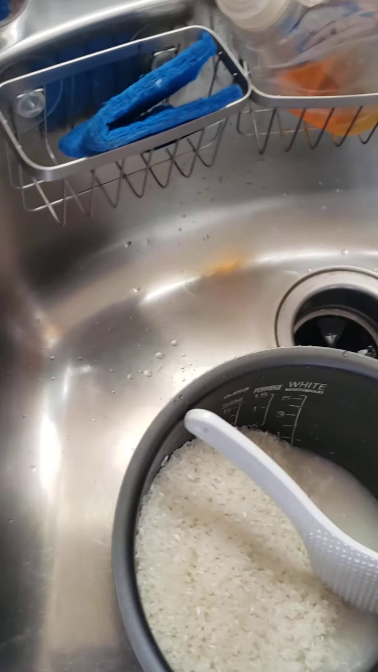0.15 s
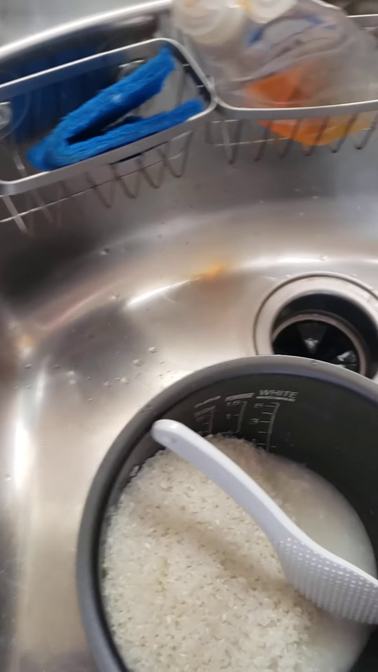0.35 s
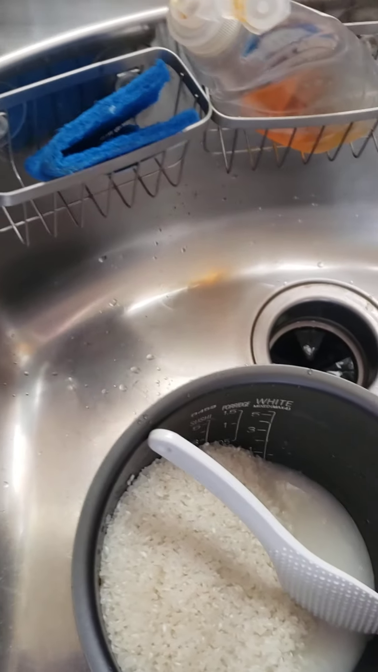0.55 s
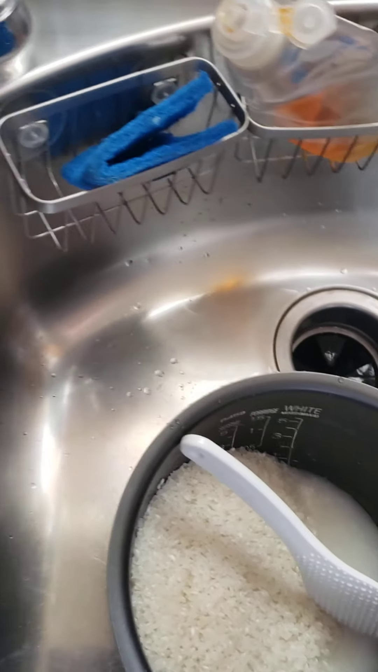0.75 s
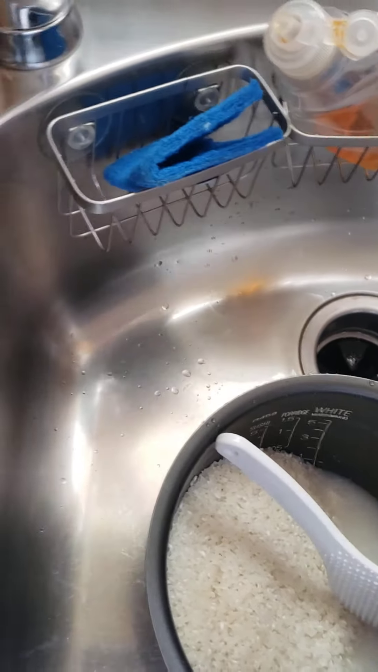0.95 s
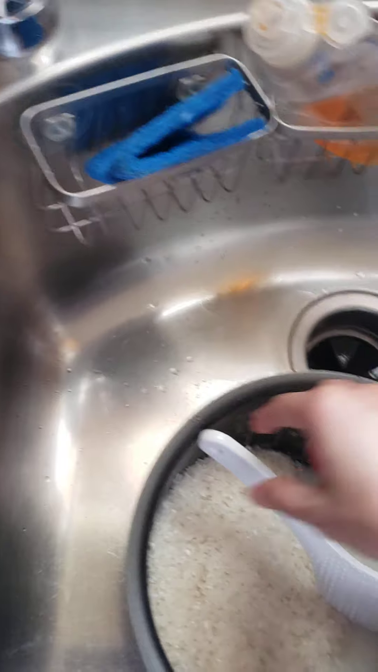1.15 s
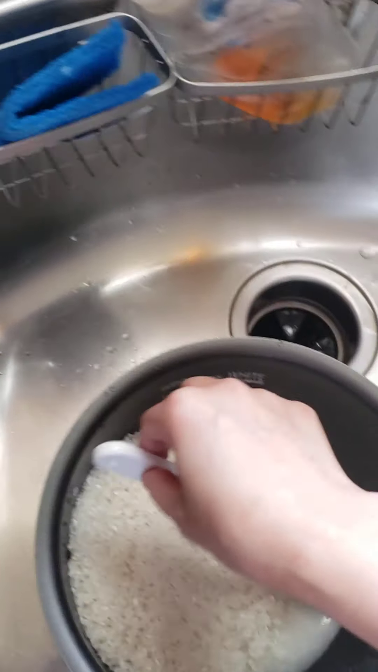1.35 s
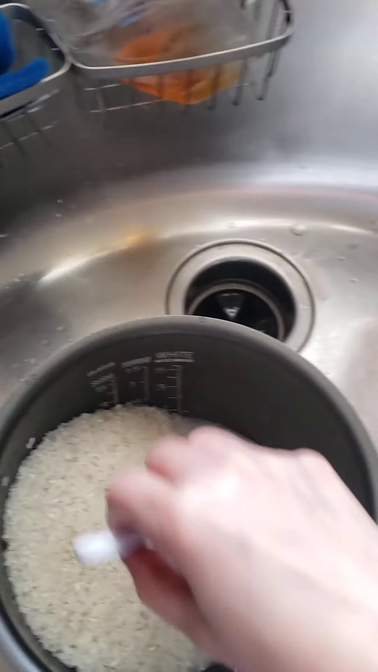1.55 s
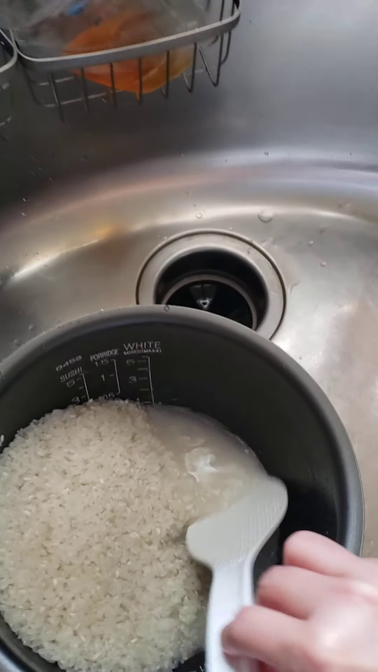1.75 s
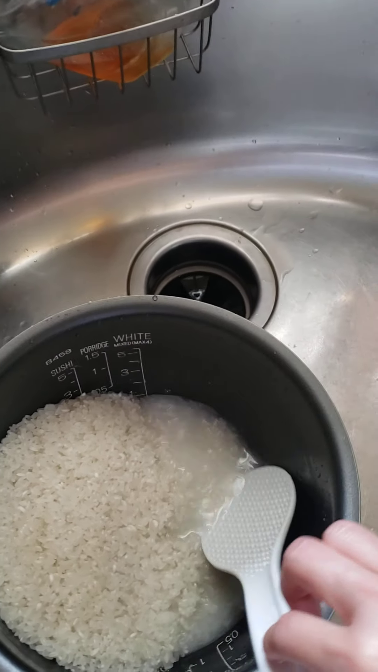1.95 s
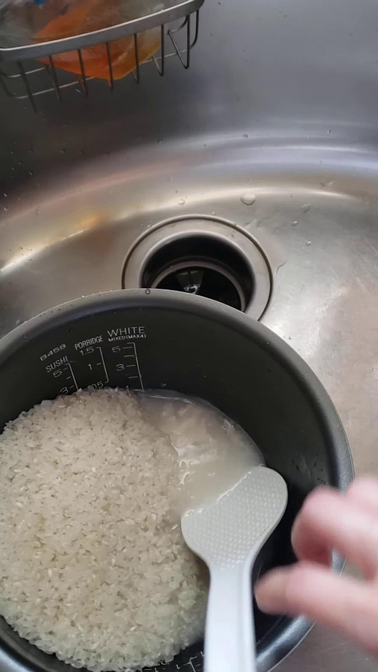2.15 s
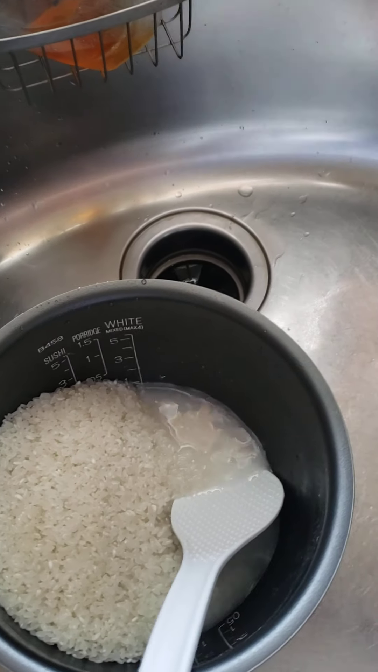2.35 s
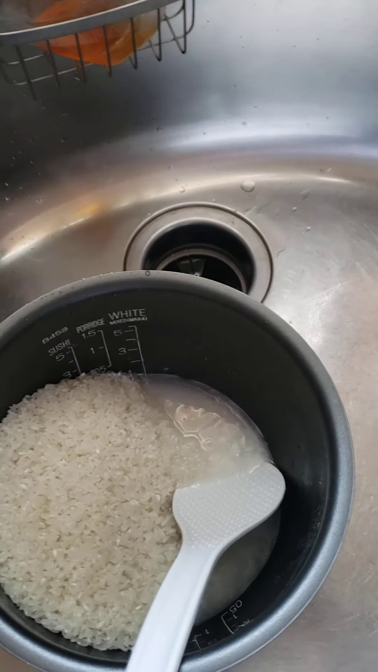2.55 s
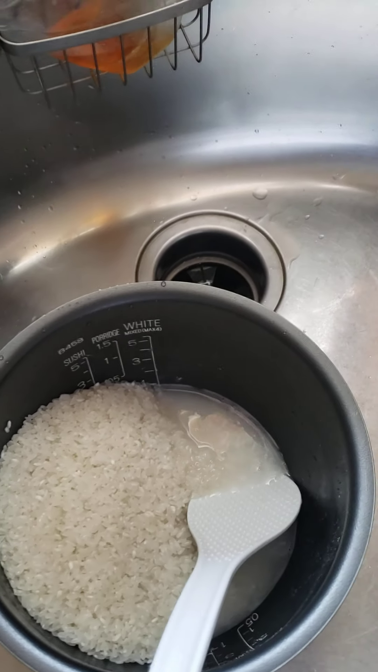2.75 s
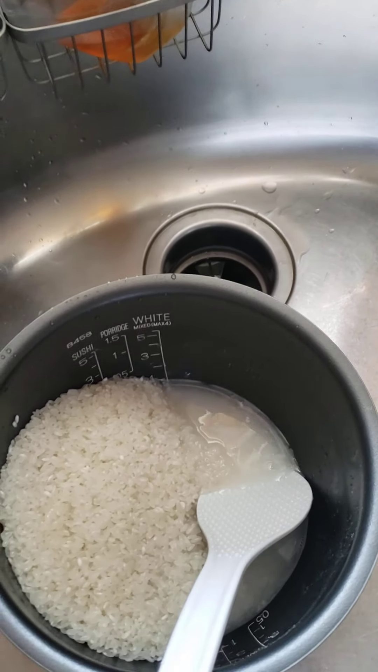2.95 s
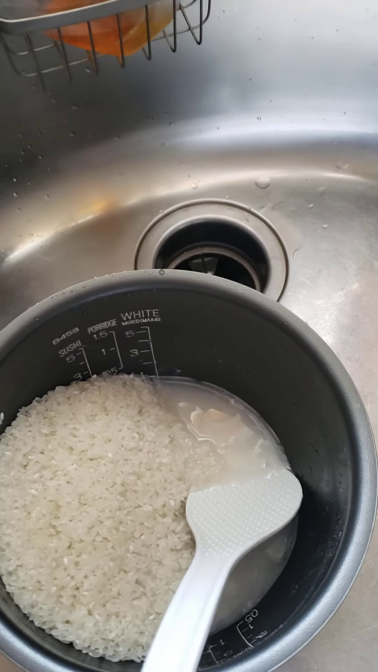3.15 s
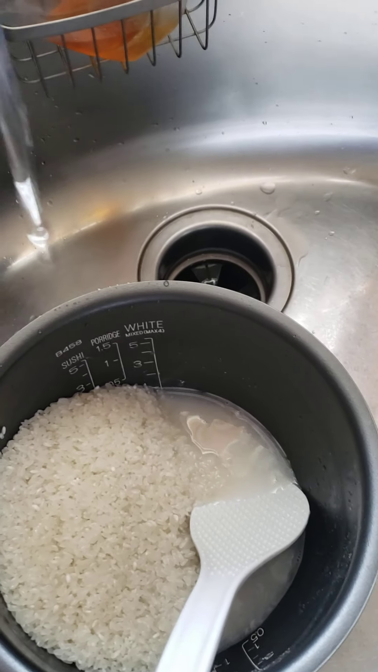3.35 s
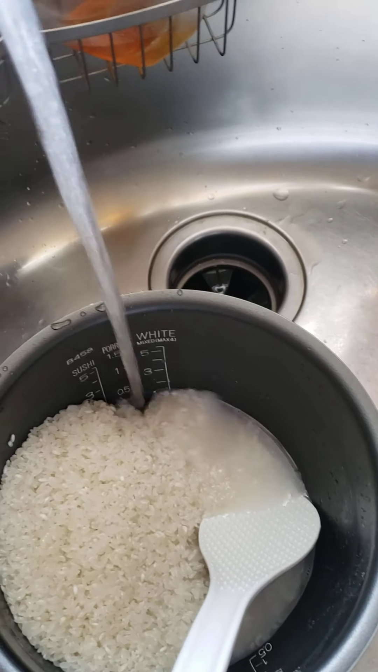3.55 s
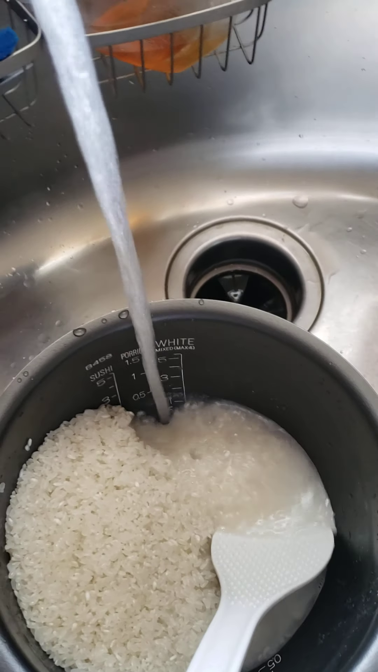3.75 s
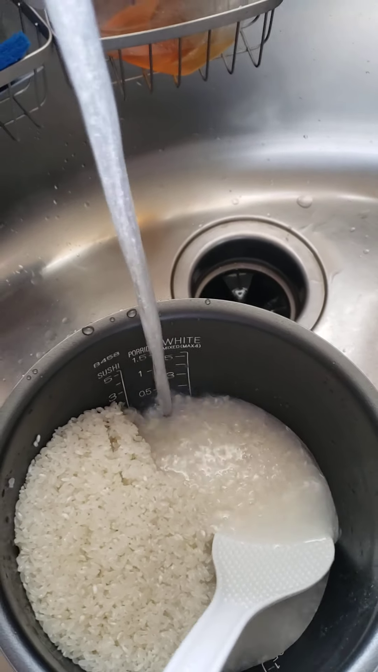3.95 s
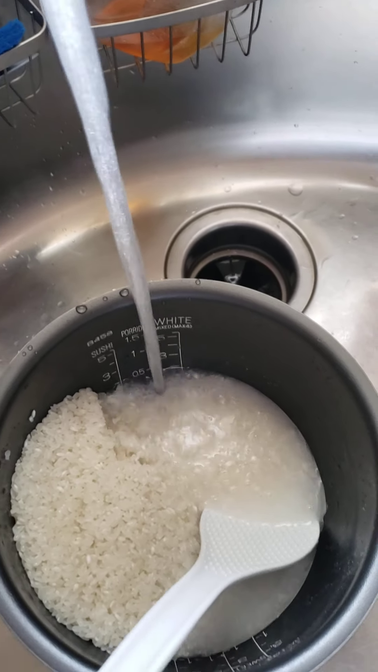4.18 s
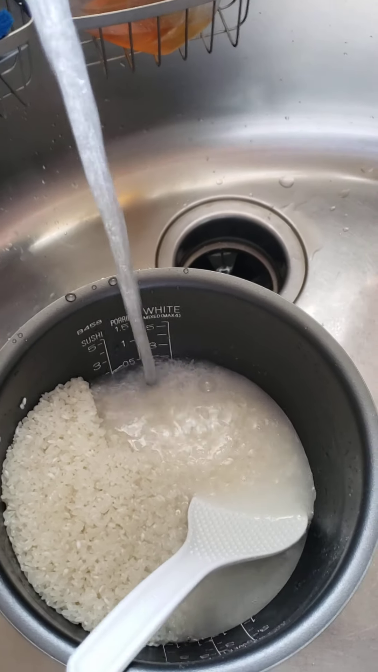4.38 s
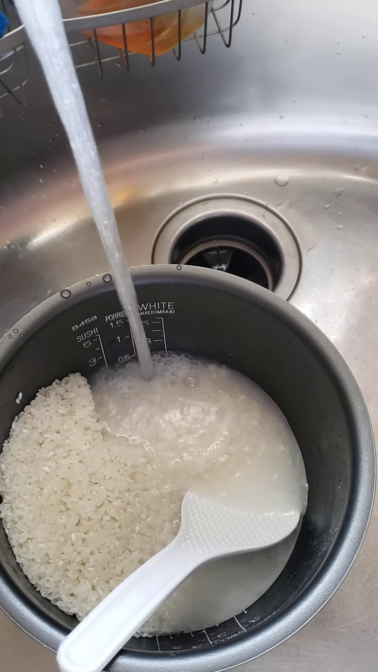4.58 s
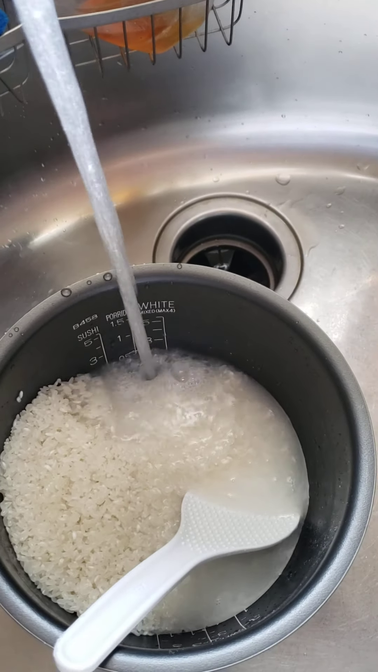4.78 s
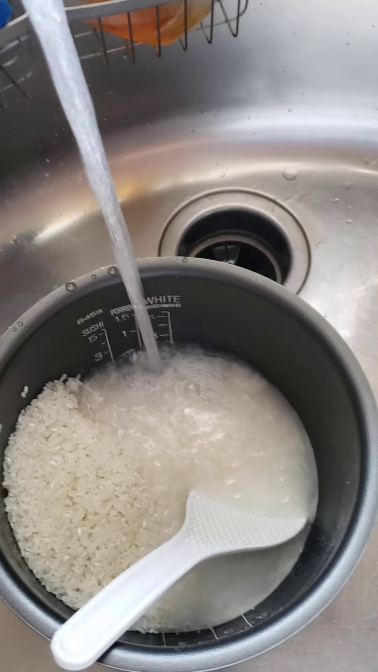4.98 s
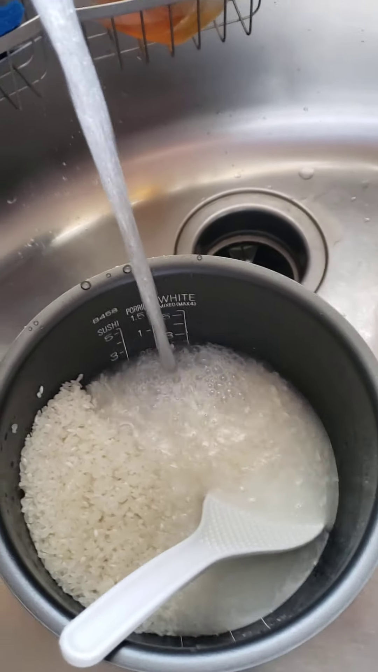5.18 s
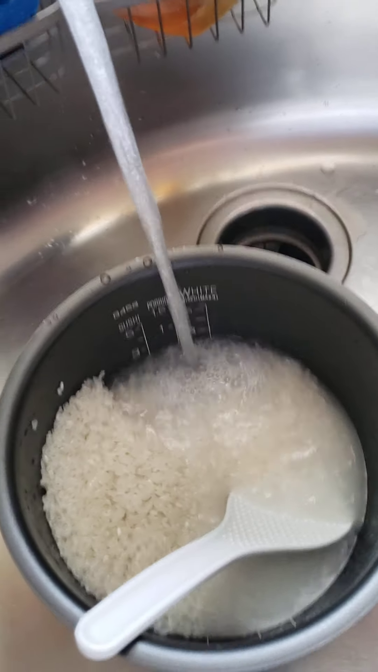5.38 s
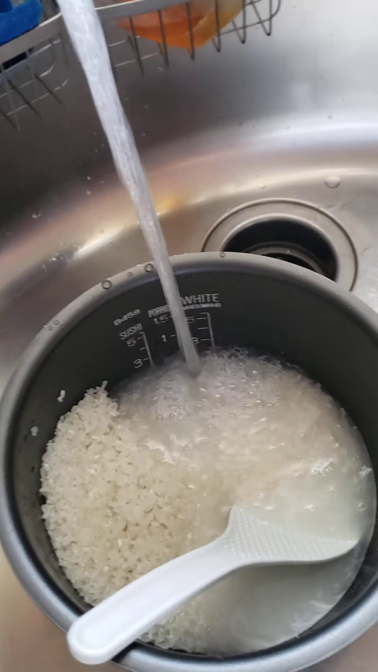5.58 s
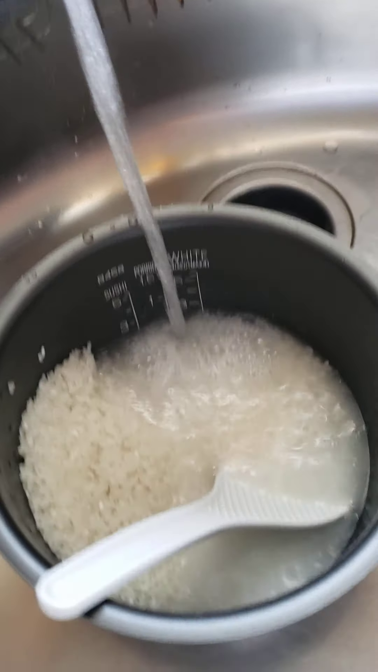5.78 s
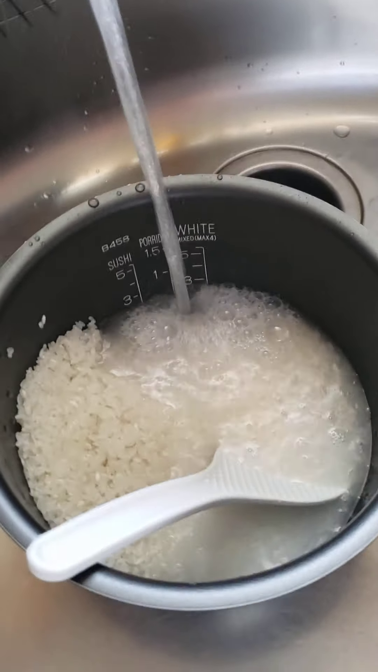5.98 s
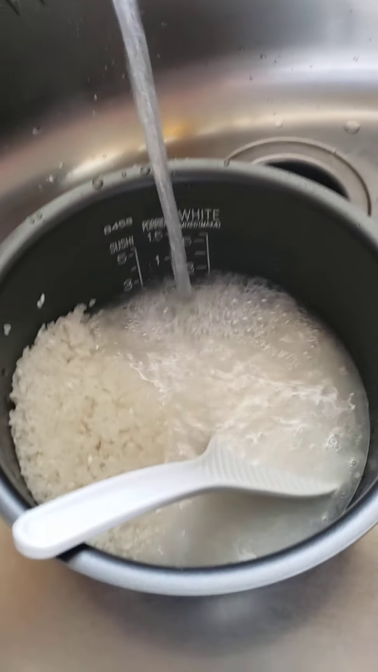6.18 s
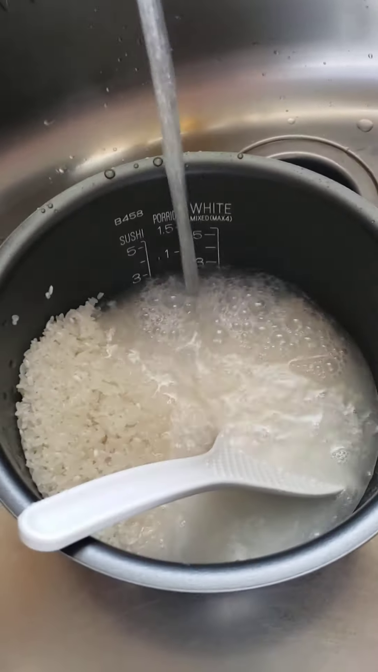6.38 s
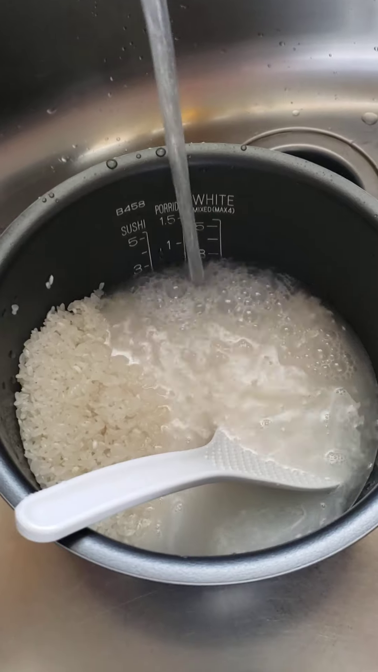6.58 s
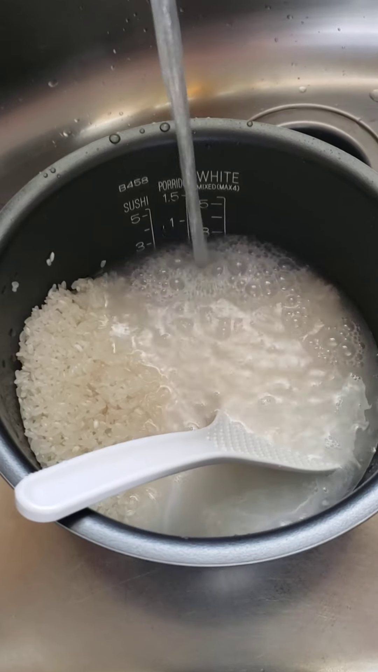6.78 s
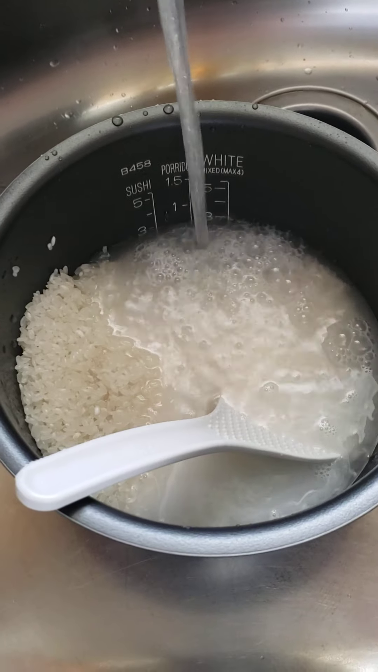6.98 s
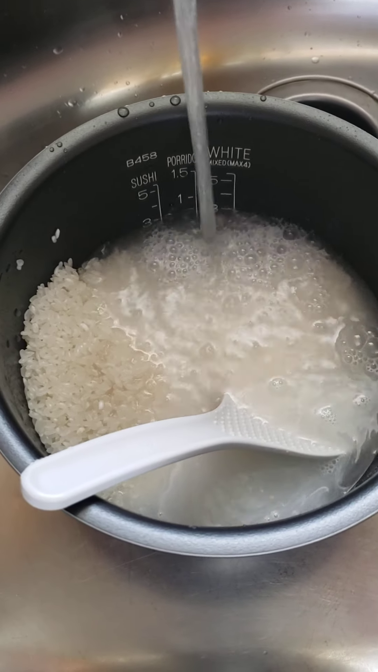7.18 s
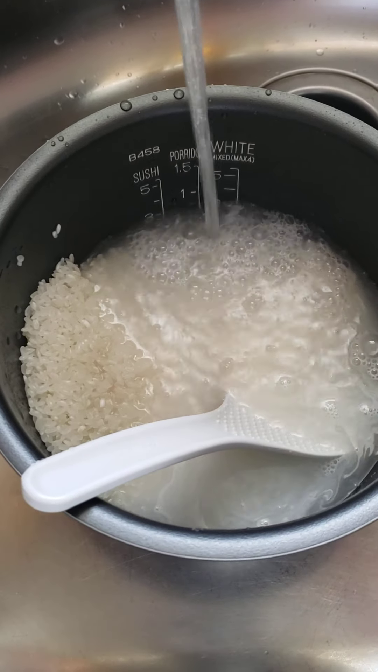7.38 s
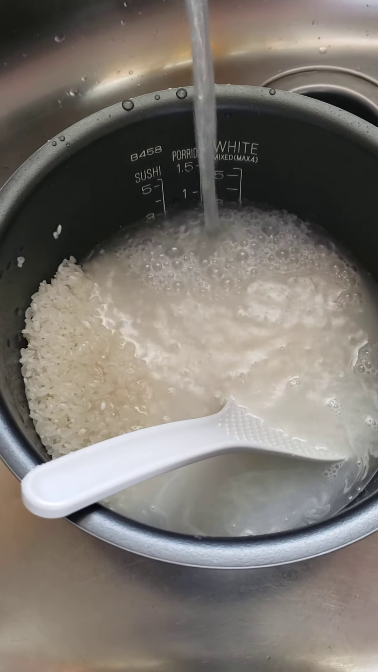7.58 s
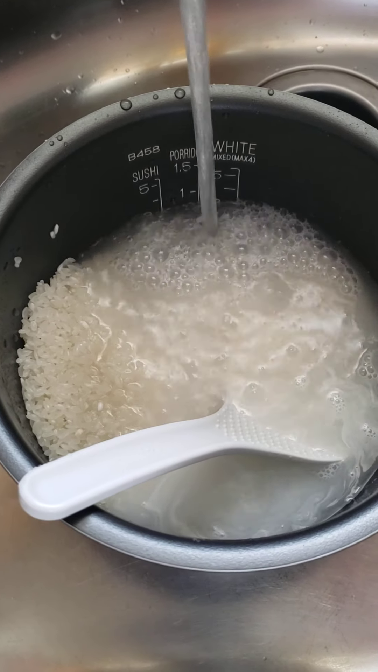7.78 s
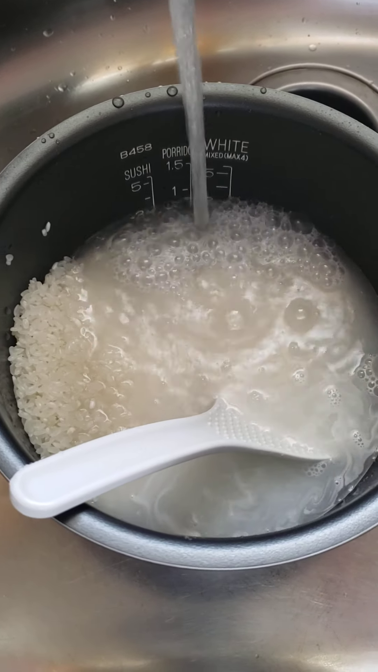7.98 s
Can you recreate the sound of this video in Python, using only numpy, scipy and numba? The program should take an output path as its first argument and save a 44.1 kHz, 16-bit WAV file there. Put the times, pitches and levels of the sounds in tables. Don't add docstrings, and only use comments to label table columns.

```python
import sys
import numpy as np
from scipy import signal
from scipy.fft import rfft, irfft, next_fast_len
from scipy.io import wavfile
from scipy.ndimage import uniform_filter1d
from numba import njit

SR = 44100
rng = np.random.default_rng(int(sys.argv[2]) if len(sys.argv) > 2 else 0)


def persist_wave(psi):
    counts = np.round(np.clip(psi, -1, 1) * 32767).astype(np.int16)
    wavfile.write(sys.argv[1], SR, np.atleast_2d(counts).T)


def volts_from_decibels(level):
    exponent = np.asarray(level, float) / 20
    return 10 ** exponent


N = 354123
SIZE = next_fast_len(N + 8192)
HZ = np.maximum(np.arange(SIZE // 2 + 1) * SR / SIZE, 1)
SIDES = np.array([[1], [-1]])

OPENS_S = 3.17
SHALLOW_S, DEEP_S = 4.24, 5.54
# (frequency [Hz], density [dB per Hz])
WET_RICE_COLOUR = [(1180, -62), (2000, -18.5), (2530, -19), (3550, -7.5), (4380, -10), (7190, -3),
                   (11700, -6), (16000, -13.5)]
# (frequency [Hz], gain [dB])
MIC_COLOUR = [(20, -1.5), (5800, -1), (7300, 2.5), (8300, -3), (9100, -7), (10300, -4.5), (12000, -2.5),
              (16000, -2)]


def shape(table):
    hz, value = np.transpose(table)
    return np.interp(np.log(HZ), np.log(hz), value)


def colour(x, gain):
    return irfft(rfft(x, SIZE) * gain, SIZE)[..., :N]


def unit(x):
    return x / np.sqrt(np.mean(x ** 2))


def band(lo_hz, hi_hz):
    return 1 / np.sqrt((1 + (lo_hz / HZ) ** 8) * (1 + (HZ / hi_hz) ** 8))


def resonances(modes):
    return sum((-1) ** k * volts_from_decibels(db) / (1 + 2j * (HZ - hz) / width)
               for k, (hz, db, width) in enumerate(modes))


def curve(rows):
    s, *columns = np.transpose(rows)
    t = np.arange(N) / SR
    last = columns[0][-1] if s[-1] > t[-1] - .1 else -140
    level = np.interp(t, s, columns[0], -140, last)
    return [level] + [np.interp(t, s, c) for c in columns[1:]]


def ramp(s, length_s):
    return np.clip((np.arange(N) / SR - s) / length_s, 0, 1)


def puff(s, tau_s):
    age = np.maximum(np.arange(N) / SR - s, 0)
    return (age > 0) * np.exp(-age / tau_s)


def swell(s, rise_s, fall_s):
    age = np.arange(N) / SR - s
    return np.exp(np.where(age < 0, age / rise_s, -age / fall_s))


def walk(rate):
    k = max(int(SR / rate), 2)
    held = np.repeat(rng.standard_normal(N // k + 1), k)
    return uniform_filter1d(uniform_filter1d(held, k), k)[:N]


def hiss():
    # (frequency [Hz], likeness of left and right [0 to 1])
    likeness = [(200, 0.97), (500, 0.98), (1000, 0.58), (2000, 0.79), (5000, 0.13), (16000, 0.23)]
    alike = np.clip(shape(likeness), 0, 1)
    mid, side = rfft(rng.standard_normal((2, N)), SIZE)
    return irfft(mid * np.sqrt(1 + alike) + SIDES * side * np.sqrt(1 - alike), SIZE)[:, :N]


def steady(x):
    envelope = np.sqrt(uniform_filter1d(x ** 2, int(.07 * SR)))
    return unit(x / (envelope + 0.28 * x.std()))


def bursts(s, db, tau_s, noise):
    gate = np.zeros(N)
    gate[(s * SR).astype(int)] = volts_from_decibels(db)
    fall = signal.lfilter([1], [1, -np.exp(-1 / (tau_s * SR))], gate)
    return uniform_filter1d(fall, int(.004 * SR)) * noise


@njit
def ring(rows, n):
    out = np.zeros((2, n))
    for k in range(len(rows)):
        s, hz, t60, glide, left, right, lead, rise = rows[k]
        a, m = int(s * SR), int(t60 * SR)
        z, p = 1 + 0j, np.exp((2j * np.pi * hz - np.log(1000) / t60) / SR)
        turn = np.exp(2j * np.pi * hz * glide / SR / max(m, 1))
        closed, opening = 1., np.exp(-1 / (rise * SR))
        for i in range(a, min(a + m, n - 64)):
            closed *= opening
            out[0, i + 30] += left * z.imag * (1 - closed)
            out[1, i + 30 - int(lead)] += right * z.imag * (1 - closed)
            z, p = z * p, p * turn
    return out


def grains(s, db, hz, pan_db, cycles, glide, lead, rise_cycles):
    place = (volts_from_decibels(db + pan_db / 2), volts_from_decibels(db - pan_db / 2), np.clip(lead, -29, 29))
    rise_s = np.maximum(rise_cycles, .01) / hz
    columns = (s - 30 / SR, hz, cycles * 3 / hz, glide, *place, rise_s)
    return ring(np.stack(np.broadcast_arrays(*columns), axis=1).astype(float), N)


def swarm(t0, t1, lo_hz, hi_hz, cycles, scatter_db, lead, count, glide=0.47):
    u = rng.random((count, 5)).T
    s = t0 + (t1 - t0) * u[0]
    hz = lo_hz * (hi_hz / lo_hz) ** u[1]
    size_db = -scatter_db * np.log(u[2] + .02)
    return grains(s, size_db, hz, 8 * (u[3] - .5), cycles, glide, lead * (2 * u[4] - 1), 0.48)


def room():
    room_colour = [(150, -36.5), (240, -3), (851, -12), (3370, -16), (5730, -22), (7270, -12.5),
                   (8580, -24), (14500, -13.5)]
    return unit(colour(hiss(), volts_from_decibels(shape(room_colour) - shape(MIC_COLOUR)))) * volts_from_decibels(-77.0)


def echoes(near):
    age = np.arange(4096) / SR
    echo = rng.standard_normal((2, 4096)) * np.exp(-age / 0.012) * (age > .0012)
    return colour(near.mean(axis=0), rfft(echo, SIZE) * band(280, 16000)) * volts_from_decibels(-30.5)


def basin():
    # (frequency [Hz], width [Hz], level [dB])
    basin_modes = [(48.8, 1.5, 7.5), (101, 24.6, -1.5), (164.4, 10.8, 5), (230.7, 14.7, -5)]
    # (time [s], peak level [dB], half length [s])
    sways = [(0.0, -65, 0.097), (.44, -53, .09), (1.307, -64.5, 0.2), (1.773, -49, .05), (1.93, -48, .07),
             (2.12, -59, 0.17), (2.564, -65.5, .12), (2.999, -60, 0.19), (3.85, -52.5, .25),
             (4.5, -52, 0.66), (5.33, -46, 0.28), (6.003, -46.5, 0.22), (6.5, -51, 0.091),
             (6.777, -47, 0.043), (7.85, -46.5, 0.78)]
    # (time [s], peak level [dB], fall [s])
    jolts = [
        (.345, -48, 0.071),
        (1.28, -53.5, .1),
        (1.83, -45.5, 0.04),
        (2.0, -48, 0.12),
        (3.06, -57, 0.083),
    ]
    rest_drum_db, rest_thud_db = -74, -83
    t = np.arange(N) / SR
    drum = volts_from_decibels(rest_drum_db) + sum(volts_from_decibels(db) * np.exp(-((t - s) / half_s) ** 2) for s, db, half_s in sways)
    thud = volts_from_decibels(rest_thud_db) + sum(volts_from_decibels(db) * swell(s, 0.0055, fall_s) for s, db, fall_s in jolts)
    depth = ramp(SHALLOW_S, DEEP_S - SHALLOW_S)
    pound_db = -50 + 1.5 * depth + 4 * walk(6)
    thud = thud + ramp(OPENS_S, .18) * volts_from_decibels(pound_db)
    modes = resonances([(hz, db, width) for hz, width, db in basin_modes])
    noise = hiss()
    drumming = steady(colour(noise, (modes + 0.16) * band(31, 70)))
    thudding = steady(colour(noise, modes * band(80, 230)))
    return drum * drumming + thud * thudding


def bumps():
    # (time [s], peak level [dB], pitch [Hz], body level [dB], tick level [dB])
    bump_events = [
        (.01, -64, 338, -69.5, -86),
        (0.345, -33, 102.3, -57.5, -95),
        (0.781, -68, 346, -78, -99),
        (1.735, -37, 95.4, -69, -99),
        (1.84, -38, 112, -71, -99),
        (0.31, -78, 467, -82, -72),
        (0.957, -92, 300, -86.5, -74),
        (3.056, -42.5, 110, -55, -58),
    ]
    s, db, hz, body_db, tick_db = np.transpose(bump_events)
    t60 = 0.27 * (100 / hz) ** .35
    out = grains(s, db, hz, 0, t60 * hz / 3, -0.039, 0, 0.35)
    body = unit(colour(hiss(), band(200, 560) + 0.24 * band(620, 1400)))
    tick = unit(colour(hiss(), band(6400, 7500) + 0.15 * band(1500, 8000)))
    for k in range(len(s)):
        out += volts_from_decibels(body_db[k]) * puff(s[k], t60[k] * 0.14) * body
        tick_fall = puff(s[k], 0.0043) + 0.2 * puff(s[k], t60[k] * 0.41)
        out += volts_from_decibels(tick_db[k]) * tick_fall * tick
    return out


def singing():
    # (time [s], half length [s], peak level [dB], start pitch [Hz], end pitch [Hz])
    sung_tones = [(1.46, 0.043, -67, 1800, 1700), (1.385, 0.033, -68, 1930, 1880),
                  (1.525, 0.044, -63, 1190, 1185), (1.63, .07, -76.5, 1300, 1190),
                  (2.1, .03, -59, 1760, 1600), (2.22, 0.069, -51.5, 1050, 1200),
                  (2.29, .05, -51, 1200, 1080), (2.28, .04, -50.5, 1880, 1930),
                  (2.26, 0.065, -55, 615, 625), (2.37, .05, -66, 620, 600), (2.33, 0.046, -60, 360, 340),
                  (.12, .04, -75.5, 440, 280), (.28, 0.027, -81, 480, 480), (0.498, 0.064, -71.5, 330, 310),
                  (4.815, .014, -33, 385, 390)]
    t, out = np.arange(N) / SR, np.zeros(N)
    for s, half_s, db, from_hz, to_hz in sung_tones:
        along = (t - s) / half_s
        slide_hz = from_hz + (to_hz - from_hz) * np.clip(along / 3 + .5, 0, 1)
        hz = slide_hz * (1 + .015 * walk(60))
        level = volts_from_decibels(db + 5 * walk(50)) * np.exp(-along ** 2)
        out += level * np.sin(2 * np.pi * np.cumsum(hz) / SR)
    return out


def rustle():
    # (time [s], peak level [dB], rise [s], fall [s])
    strokes = [
        (1.444, -51, 0.01, 0.049),
        (1.69, -65.5, 0.0028, 0.055),
        (1.742, -53.5, .018, 0.03),
        (1.828, -64, .006, .025),
        (1.981, -58.5, 0.0092, 0.022),
        (2.296, -77.5, .3, 0.13),
    ]
    crackle = unit(swarm(0.84, 3.4, 3700, 16000, 3.5, 3.2, 6, count=3000)[:, SR:3 * SR])
    crackle = np.pad(crackle, ((0, 0), (SR, N - 3 * SR)))
    crackle = crackle + 0.68 * unit(hiss()) * volts_from_decibels(4.0 * walk(70))
    level = sum(volts_from_decibels(db) * swell(s, rise_s, fall_s) for s, db, rise_s, fall_s in strokes)
    level = level * ramp(1.3, .05) * (1 - ramp(2.4, .08))
    return level * unit(colour(crackle, volts_from_decibels(shape(WET_RICE_COLOUR)))) * 0.77


def drag():
    # (time [s], level [dB], lift of high modes [dB], lows falling by twice as much)
    drags = [
        [(1.25, -108, 7), (1.272, -47, 8.5), (1.31, -39, 7.5), (1.384, -63.5, -2.5), (1.534, -79.5, 4),
         (1.66, -85, -6.5)],
        [(1.705, -62.5, -1.5), (1.768, -60, -4), (1.896, -61, -1), (2.17, -57, -3), (2.224, -56.5, -3.5),
         (2.266, -50.5, 1.5), (2.388, -64, -2.5), (2.48, -103, -6)],
    ]
    # (frequency [Hz], level [dB], width [Hz])
    walls = [
        [(390, 1.5, 77), (716, -7.5, 88), (1110, 2.5, 31), (1198, -5.5, 14), (1310, -13, 36), (1810, -11, 37),
         (1910, -0.5, 12), (2720, -8, 12), (3340, -30, 27)],
        [(300, -8, 91), (378, -5, 42), (486, -14.5, 80), (630, -3, 7.2), (955, -19, 70), (1075, -0.5, 12),
         (1180, -6.5, 130), (1772, 1, 28), (1923, -4, 19), (2740, -22, 40)],
    ]
    out = 0
    slips = hiss() * volts_from_decibels(4.5 * walk(120))
    for rows, modes, bed in zip(drags, walls, (.006, .05)):
        wall = (resonances(modes) + bed) * band(220, 3500) ** 2
        low = unit(colour(slips, wall * band(1, 900)))
        high = unit(colour(slips, wall * band(900, 20000)))
        top = colour(high, band(1600, 20000))
        db, tilt_db = curve(rows)
        out = out + volts_from_decibels(db) * (volts_from_decibels(-2 * tilt_db) * low + high + (volts_from_decibels(tilt_db) - 1) * top)
    return out


def knocks():
    # (time [s], peak level [dB], crack level [dB], crack tail [s])
    knock_events = [
        (1.273, -41.5, -27.5, 0.069),
        (1.738, -22.5, -19, 0.052),
        (1.827, -24, -14, 0.024),
        (1.983, -30, -24.5, 0.03),
        (2.147, -47, -23, 0.03),
    ]
    # (frequency [Hz], level [dB], t60 [s])
    struck_modes = [
        [(1100, 1, .2), (1206, -22, 0.4), (1870, -2, 0.16), (2700, -11, 0.16)],
        [(504, -39, 0.29), (607, -21, 0.25), (920, -5, 0.064), (1763, -5.5, 0.097), (2990, -20, 0.02)],
        [(465, -12.5, 0.17), (1197, -0.5, 0.11), (1773, 2.5, 0.065), (1940, -15.5, 0.21), (2676, -30.5, 0.31),
         (3800, -27.5, 0.18), (6670, -8.5, 0.05)],
        [(600, -17, 0.2), (1100, -14, 0.17), (1070, -3, 0.06), (1760, 0.5, 0.12), (1890, -10, 0.35),
         (2380, -30, 0.21), (2700, -10, 0.21)],
        [(1207, 11, 0.15), (933, 7, .1), (1744, 12, 0.066), (1880, -8, 0.3)],
    ]
    out = 0
    rough = unit(colour(hiss(), band(250, 9700) * volts_from_decibels(shape(WET_RICE_COLOUR) * .5)))
    thick = unit(colour(hiss(), band(300, 2300)))
    for (s, db, crack_db, tail_s), modes in zip(knock_events, struck_modes):
        hz, mode_db, t60 = np.transpose(modes)
        out = out + grains(s, db - 5.0 + mode_db, hz, 0, np.minimum(t60, .7) * hz / 3, 0, 0, 0.69)
        out += volts_from_decibels(db + crack_db) * (puff(s, 0.0029) + 0.42 * puff(s, tail_s)) * rough
        out += volts_from_decibels(db + crack_db * 0.23 - 7.5) * puff(s, 0.015) * thick
    return out


def valve():
    # (frequency [Hz], width [Hz], level [dB])
    whistles = [(1970, 230, -14), (3760, 69, -3), (4200, 60, -7), (4550, 90, -4), (5200, 120, -1),
                (6900, 600, -2.5)]
    gaps = resonances([(hz, db, width) for hz, width, db in whistles])
    return unit(colour(hiss(), gaps + 0.12 * band(3500, 9000) + band(8400, 17000) * 0.55))


def splashing():
    low, high, bed = walk(30), walk(40), 0
    for hz in 230 * 2 ** np.arange(0, 6.3, .5):
        shared = low if hz < 2600 else high
        flicker = volts_from_decibels(1.24 * shared + 0.49 * walk(12) + 2.16 * walk(50))
        bed = bed + flicker * unit(colour(hiss(), band(hz / 1.19, hz * 1.19))) * np.sqrt(hz)
    crackle = colour(swarm(3.4, 8.03, 2380, 17400, 7.3, 3.26, 8, count=6000), HZ)
    fizz = colour(swarm(3.4, 8.03, 280.3, 3030, 7.9, 4.4, 6, count=2500), HZ ** 0.57)
    return unit(bed) + .5 * unit(crackle) + 0.24 * unit(fizz)


def pot_voices(flat):
    # (frequency [Hz], density [dB per Hz])
    stream_colours = [
        [(120, -45), (200, 6), (322, -16), (680, -12), (933, -11), (2090, -15.5), (7270, -10.5), (16000, -12.5)],
        [(120, -47.5), (200, -7), (500, -13), (660, -9), (990, -9.5), (2900, -13), (8000, -10.5),
         (16000, -11.5)],
    ]
    # (frequency [Hz], shallow level [dB], deep level [dB], width [Hz])
    hollow = [(324.4, -48, -8.5, 53), (407.7, -2, 0.5, 15), (474, -8, -14.5, 41), (606.4, 4, -14.5, 11.5),
              (650, -10.5, -3.5, 31), (722, -2.5, -7, 27), (841, -8, -16.5, 43), (939.4, 1.5, 0, 16),
              (1151, -11.5, -13, 67), (1397, -4.5, -2, 81), (1750, -12, -14.5, 120), (1933, -7, -2.5, 71),
              (2340, -29, -10.5, 79), (3770, -34, -6.5, 82)]
    voices = []
    for k in range(2):
        modes = resonances([(m[0], m[k + 1], m[3]) for m in hollow])
        voices.append(unit(colour(flat, volts_from_decibels(shape(stream_colours[k])) * 1.08 + modes)))
    return voices


def bubbles(churn):
    # (time [s], peak level [dB], pitch [Hz])
    big_bubbles = [(4.051, -26.5, 627), (4.155, -42, 820), (4.537, -34.5, 630), (4.578, -36.5, 663),
                   (4.64, -37, 641), (4.681, -34.5, 647), (4.807, -32.5, 643), (4.993, -33, 850),
                   (5.025, -35.5, 632), (5.096, -36, 877), (5.126, -35, 732), (5.14, -34, 770),
                   (5.153, -32, 656), (5.218, -34, 647), (5.259, -39, 666), (5.276, -30, 640),
                   (5.322, -43, 670), (5.338, -30.5, 637), (5.378, -38, 670), (5.472, -35.5, 714),
                   (5.527, -32, 655), (5.56, -38, 754), (5.575, -34, 650), (5.599, -30, 647),
                   (5.798, -42, 789), (5.896, -36, 860), (5.926, -34, 762), (5.976, -32, 713),
                   (5.993, -29.5, 626), (6.276, -36, 690), (6.424, -30.5, 872), (6.448, -30, 660),
                   (6.486, -36, 751), (6.537, -39, 813), (6.764, -26, 662), (6.97, -41, 720),
                   (7.005, -35, 657), (7.099, -37, 676), (7.183, -38, 773), (7.219, -29.5, 657),
                   (7.26, -34, 713), (7.306, -34, 729), (7.321, -25, 705), (7.363, -32, 765),
                   (7.378, -19, 660), (7.493, -30, 734), (7.518, -34, 732), (7.544, -30, 647),
                   (7.574, -30, 674), (7.619, -26, 680), (7.663, -28.5, 668), (7.718, -21.5, 664),
                   (7.792, -26, 670), (7.822, -25, 683), (7.897, -27.5, 750), (7.975, -31, 670)]
    # (time [s], peak level [dB], pitch [Hz])
    twins = [
        (4.062, -31, 623),
        (7.232, -32, 682),
        (7.34, -33, 704),
        (7.391, -23.5, 718),
        (7.587, -32.5, 685),
        (7.637, -29, 700),
        (7.745, -31, 690),
    ]
    # (time [s], peak level [dB], pitch [Hz])
    blips = [(4.6914, -30, 1920), (4.7957, -37, 1760), (5.096, -28, 930), (5.125, -33, 1240),
             (5.1415, -30, 1160), (5.1845, -30, 1140), (5.249, -30, 1880), (5.2904, -33, 1370),
             (5.3382, -31, 1150), (5.449, -31, 1870), (5.5749, -19, 1275), (5.5962, -31, 1850),
             (5.6929, -33, 1950), (5.8291, -28, 1940), (5.8468, -26, 1930), (5.9282, -26.5, 1920),
             (6.0229, -21.5, 1780), (6.0845, -27.5, 1720), (6.1763, -23.5, 1720), (6.4482, -31, 1280),
             (6.764, -29, 1350), (6.9378, -33, 1350), (7.3881, -27, 890), (7.419, -31, 1660),
             (7.4652, -32, 1110), (7.615, -27.5, 1170), (7.7408, -36, 1170), (7.7902, -26, 1730),
             (7.974, -33, 1130), (7.9942, -26, 1370)]
    # (time [s], peak level [dB])
    slaps = [
        (5.246, -41),
        (5.927, -33),
        (6.019, -21.5),
        (6.763, -30),
        (7.793, -32),
    ]
    s, db, hz = np.transpose(list(big_bubbles) + list(twins))
    slap_db = -5 - 4.5 * (s - SHALLOW_S)
    cycles = 12.8 + 0.23 * (db + 29)
    out = grains(s, db + 7.5, hz, 0, cycles, 0.031, 0, 2.34)
    out += bursts(s, db + slap_db - 8.5, 0.0071, churn)
    s, db, hz = np.transpose(blips)
    out += grains(s, db + 7.0, hz, 0, 7.7, .08, 0, 1.4) + bursts(s, db - 10.0, 0.0032, churn)
    return out + bursts(*np.transpose(slaps), 0.0064, churn * volts_from_decibels(-8.0))


def droplets(spray, spout):
    # (time [s], peak level [dB], pitch [Hz])
    snaps = [(3.5376, -18, 3870), (3.5925, -24.5, 3930), (3.6863, -34, 3500), (3.7227, -26.5, 3640),
             (3.808, -26, 4230), (3.8779, -18, 4220), (3.9018, -22, 3530), (3.9846, -30.5, 2900),
             (4.029, -20.5, 3550), (4.051, -26, 2750), (4.0944, -28.5, 3340), (4.1313, -30, 3130),
             (4.2774, -27, 3290), (4.2954, -27, 3650), (4.3902, -20.5, 4370), (4.494, -27, 4020),
             (4.5683, -26.5, 3520), (4.7928, -29, 2990), (5.1325, -31, 2280), (5.4189, -29, 5840),
             (5.4508, -30, 3140), (5.5965, -30.5, 2290), (5.6458, -35, 2280), (5.6793, -37.5, 2420),
             (5.7272, -29, 2300), (5.8294, -34.5, 2460), (5.9556, -37.5, 5170), (6.007, -28, 2380),
             (6.0709, -33.5, 2520), (6.1746, -29.5, 2490), (6.3363, -31, 4550), (6.3941, -31, 4450),
             (6.4306, -30.5, 3380), (6.474, -30, 4290), (6.5009, -29, 4550), (6.8975, -29.5, 4150),
             (7.1629, -33.5, 2550), (7.2432, -30, 2290), (7.3036, -32.5, 3420), (7.349, -28.5, 4150),
             (7.4198, -30, 2340), (7.4617, -27, 3320), (7.5834, -29.5, 2440), (7.7575, -22.5, 4560),
             (7.8758, -31, 2610)]
    # (time [s], peak level [dB], pitch [Hz])
    ticks = [(3.4418, -24, 12640), (3.4957, -23.5, 14670), (3.5323, -26.5, 7360), (3.559, -21, 14000),
             (3.6089, -23.5, 7370), (3.6827, -22.5, 7300), (3.7222, -17, 7400), (3.774, -24.5, 6550),
             (3.795, -21.5, 7400), (3.8773, -28, 6740), (3.9035, -22, 8100), (4.2935, -21.5, 10850),
             (4.4091, -16, 7310), (4.5643, -28, 7330), (5.5324, -25, 10900), (5.5839, -26.5, 11500),
             (5.759, -22.5, 14760), (6.1177, -24, 12350), (6.1787, -20.5, 14000), (6.204, -30, 6320),
             (6.6051, -29, 13200), (6.8218, -29.5, 12400), (6.8371, -24.5, 12500), (6.9042, -20, 15300),
             (6.9488, -23.5, 13200), (7.0087, -29, 15500), (7.0945, -24.5, 15750), (7.5116, -26.5, 12700),
             (7.537, -27.5, 13300), (7.866, -29, 14000)]
    s, db, hz = np.transpose(snaps)
    spatter_db = -37 + .5 * (db + 22)
    out = grains(s, db + 4.0, hz, 0, 17.0, 0.12, 0, 2.2)
    out += bursts(s, db - 12.5, 0.0059, spray) + bursts(s, spatter_db - 10.5, 0.0031, spout)
    s, db, hz = np.transpose(ticks)
    return out + grains(s, db + 3.5, hz, 0, 15.0, 0.027, 0, 2.0) + bursts(s, db - 7.5, 0.003, spout)


def water():
    # (time [s], splashing level [dB], trapped air level [dB])
    flow = [(3.3, -7, -13), (3.46, -2.5, -2.5), (3.6, 2, -5), (3.86, 3.5, -1), (3.91, 9, -7),
            (3.97, 4, -2.5), (4.14, 0.5, -3), (4.5, 1, -3.5), (4.85, 0.5, 1), (5.6, -1, -0.5),
            (5.9, -1.5, 3.5), (6.6, -1, -2.5), (7.15, 0.5, 1), (7.35, -1.5, 3), (7.62, -1, 2),
            (7.72, 0, 4.5), (8.03, -1, 0.5)]
    t = np.arange(N) / SR
    depth = ramp(SHALLOW_S, DEEP_S - SHALLOW_S)
    landed = ramp(3.3, 0.25)
    shallow, deep = pot_voices(splashing())
    in_pot = (1 - depth) * shallow + depth * deep
    in_air = valve() + 0.33 * colour(shallow, band(160, 1220))
    sound = landed * in_pot + (1 - landed) * in_air
    edges_hz = ((200, 676), (850, 1840), (2500, 5230), (8700, 51000))
    gurgle, churn, spray, spout = (unit(colour(sound, band(*edge))) for edge in edges_hz)

    s, splash, air = np.transpose(flow)
    splash_db, air_db = np.interp(t, s, splash), np.interp(t, s, air)
    gush = np.exp(-((t - 3.338) / 0.071) ** 2)
    spit_s, spit_hold_s = 0.046, 0.074
    spit = np.minimum(puff(OPENS_S, spit_s) * np.exp(spit_hold_s / spit_s), 1)
    lands_s, landing_s = 3.435, 0.074
    hissing = volts_from_decibels(-43.5 + 0.42 * splash_db) * ramp(lands_s - landing_s, 2 * landing_s)
    hissing = hissing + volts_from_decibels(-42.5) * spit
    mix = (volts_from_decibels(-50 + air_db) * landed + volts_from_decibels(-44.5) * gush) * gurgle
    mix += (volts_from_decibels(-45 + 0.11 * air_db) + volts_from_decibels(-37.5) * gush) * churn
    mix += volts_from_decibels(-43 + splash_db) * spray + volts_from_decibels(6.5) * hissing * spout
    plops = swarm(SHALLOW_S, 8.03, 641, 749, 14.2, 2.05, 6, count=260, glide=.06)
    mix += volts_from_decibels(-41 + 1.33 * air_db) * np.sqrt(depth) * plops
    mix *= ramp(OPENS_S, 0.041) ** 2
    return mix + bubbles(churn) + droplets(spray, spout)


def scene():
    near = bumps() + singing() + rustle() + drag() + knocks() + water()
    return room() + echoes(near) + basin() + near


def roll_off(x):
    return signal.sosfilt(signal.butter(12, 15960, fs=SR, output="sos"), x)


def record(dry):
    # (frequency [Hz], left minus right [dB])
    left_db = [(50, 4), (300, 1), (1000, -2), (4000, 3.5), (8000, 5.5), (14000, 6)]
    # (frequency [Hz], phase by which left leads [radians])
    left_lead = [(60, 0.26), (250, -0.45), (500, 0.4), (700, 0.92), (1000, 1.75), (2400, 1.5), (4200, 1.48),
                 (6600, 6), (14000, -20.5)]
    gain = volts_from_decibels(shape(MIC_COLOUR) + SIDES * shape(left_db) / 2)
    ports = gain * np.exp(.5j * SIDES * shape(left_lead))
    return roll_off(colour(dry, ports * (HZ < 15950)))


dry = scene()
out = record(dry)
persist_wave(out)
```